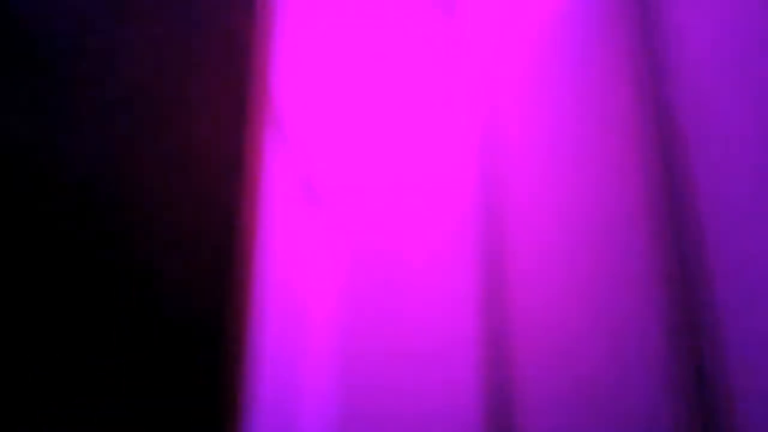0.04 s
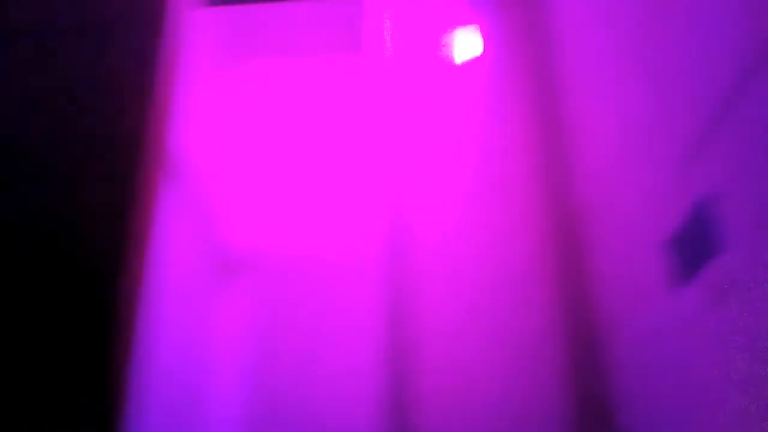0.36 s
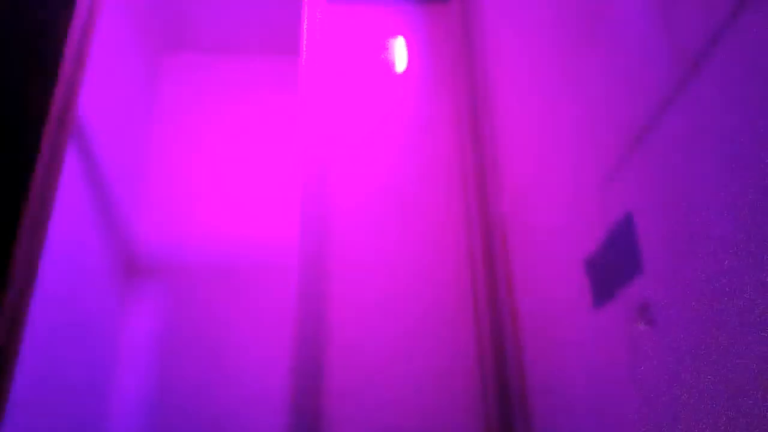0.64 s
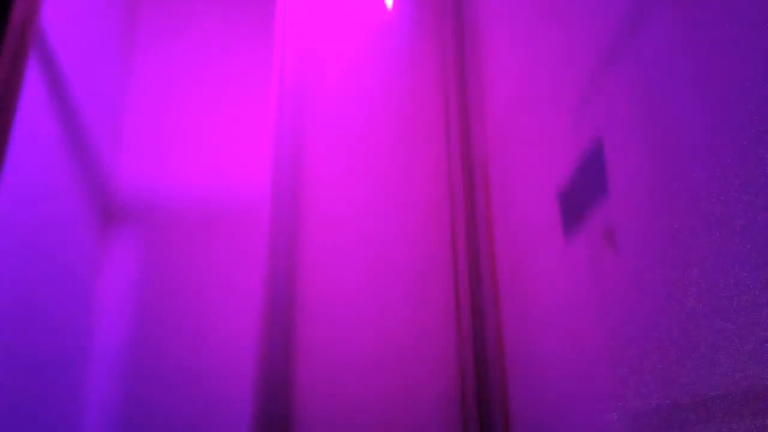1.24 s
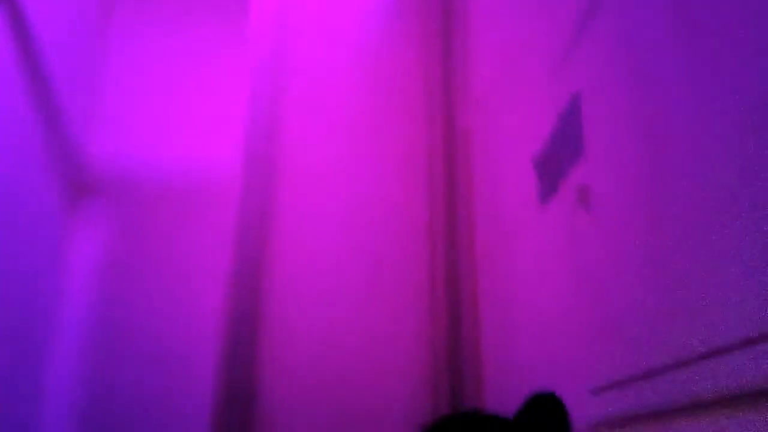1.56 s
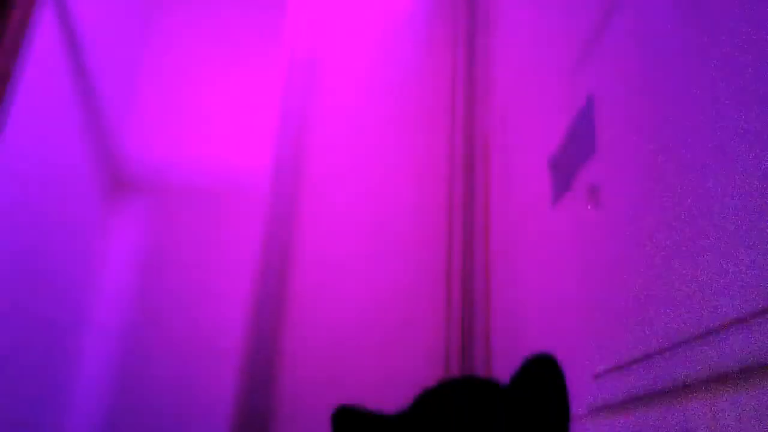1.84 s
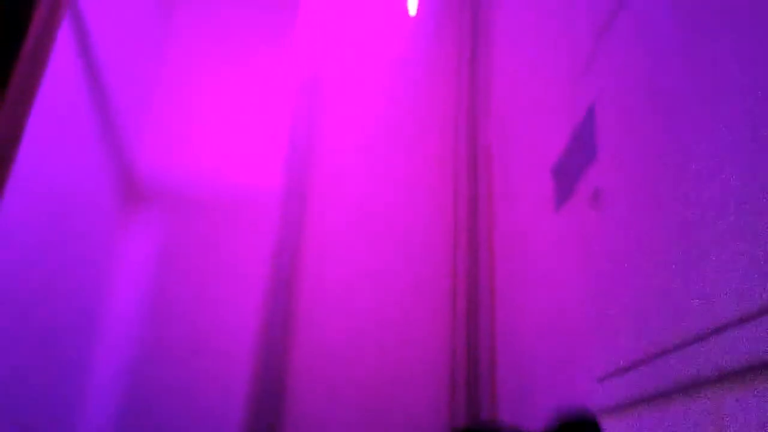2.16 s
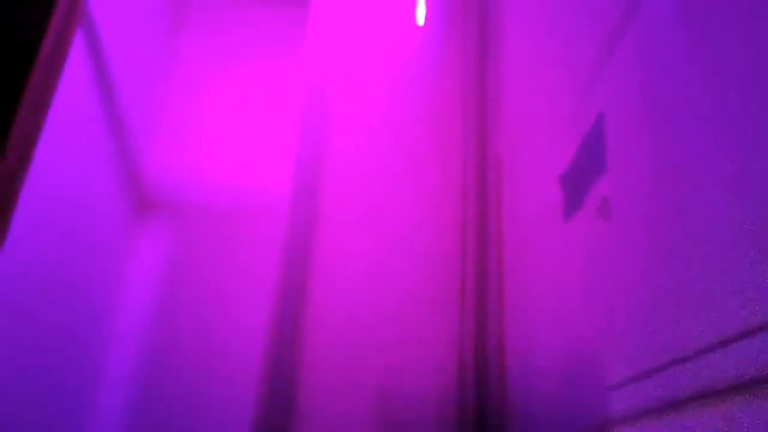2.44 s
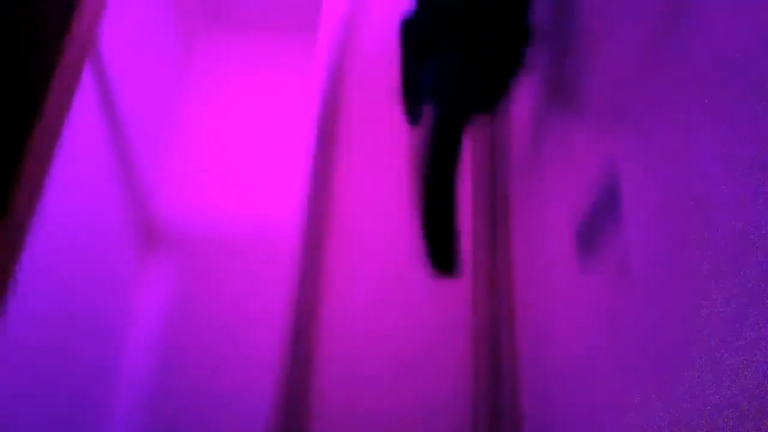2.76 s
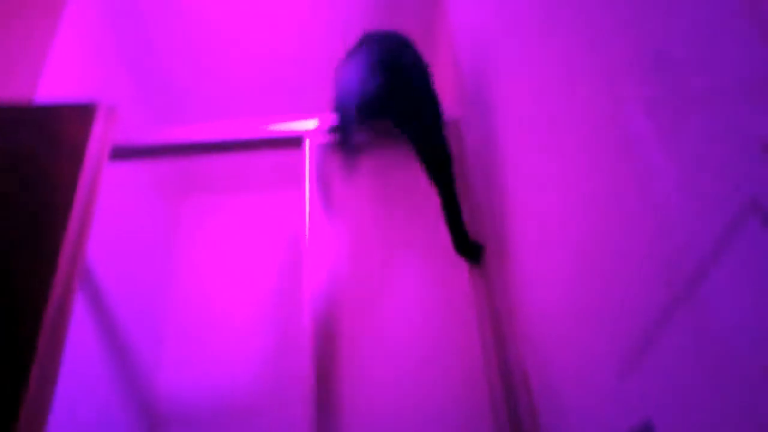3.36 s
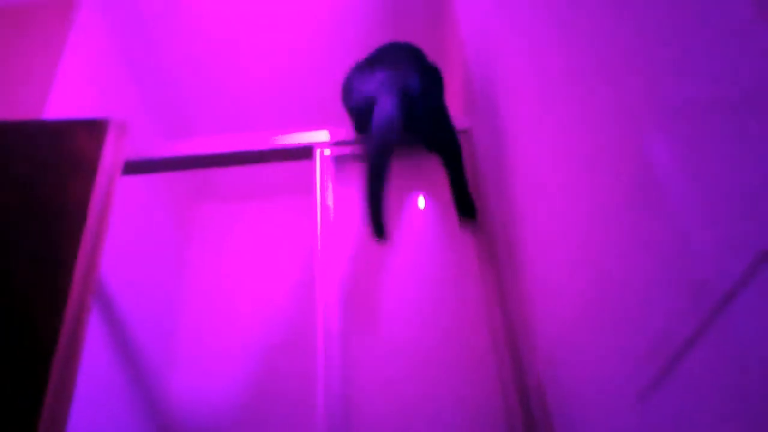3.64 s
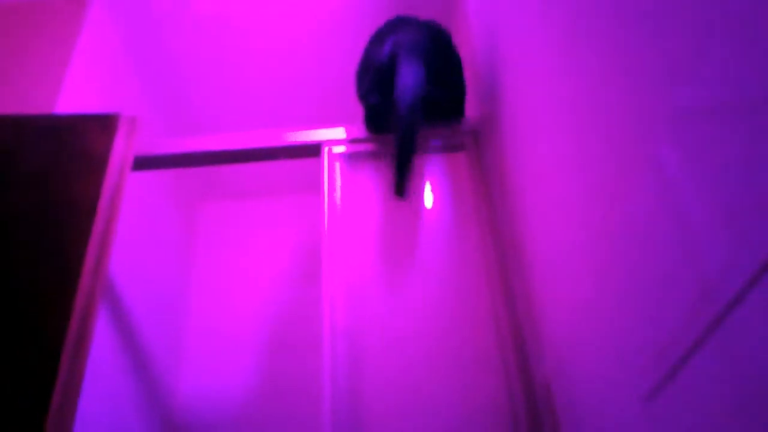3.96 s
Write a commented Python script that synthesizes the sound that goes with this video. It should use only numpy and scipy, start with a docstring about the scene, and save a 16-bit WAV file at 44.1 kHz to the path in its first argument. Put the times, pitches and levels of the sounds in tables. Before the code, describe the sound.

After a quiet moment, a cat crashes onto a glass shower wall, which booms and clatters.

```python
"""A cat slams into a glass shower enclosure, heard in stereo from inside a small tiled bathroom.
The panel booms and sways, the metal frame clatters, and the paws scrabble for a hold on the top rail.
Before the leap come soft steps and a push off the perch, over faint hiss and a low mains hum.
Right beside the microphone, the hand-held case gives dry ticks and dull finger bumps."""
import sys
import numpy as np
from scipy import signal
from scipy.io import wavfile

SR = 44100
rng = np.random.default_rng(int(sys.argv[2]) if len(sys.argv) > 2 else 0)


def generate_wav(signal):
    """Clip the signal to [-1, 1] and save it as 16-bit WAV at the path in sys.argv[1]."""
    frames = np.transpose(np.atleast_2d(signal))
    scaled = np.clip(frames, -1, 1) * 32767
    pcm = np.round(scaled).astype(np.int16)
    wavfile.write(sys.argv[1], SR, pcm)


N = 176400
T = np.arange(N) / SR


# paws and body hit the enclosure: t/s, glass level/dB, frame level/dB, rail level/dB, rattle decay/s
ENCLOSURE_HITS = [(2.665, -36, -33, -25, 0.0034), (2.915, -15.5, -24, -44, 0.0032),
                  (2.923, -4.5, 0.5, -12, 0.012), (2.949, 6, 4.5, -18, 0.001), (2.965, 1.5, -1, 0, .001),
                  (2.987, 2, 0.5, -24, 0.0036), (3.005, -2.5, -20, -9.5, 0.0047),
                  (3.045, -8.5, -31, -14, 0.014), (3.159, -14, -10, 0.5, 0.0028),
                  (3.241, -17.5, -7, -2.5, .005), (3.283, -19, -8.5, -17, 0.013),
                  (3.375, -23, -20.5, -29, 0.032), (3.451, -24, -17.5, -28, 0.0041),
                  (3.485, -27, -16.5, -30, 0.051), (3.517, -25.5, -18.5, -32, 0.016),
                  (3.554, -26.5, -26.5, -30.5, 0.014), (3.625, -24.5, -33, -34.5, 0.04)]
# ringing of the panel: f/Hz, level/dB, t60/s
PANEL_MODES = [(158, -8, .6), (184, -8, .45), (263, -4.5, .4), (300, -3.5, .45), (362, -1.5, .42),
               (482, -4, .25), (502, -6, .3), (555, -5, .27), (640, -2, .3), (734, -3, .28), (818, -3, .3),
               (905, -2, .27), (1020, -3, .28), (1058, -2, .28), (1413, -3, .25), (1592, -3, .27),
               (1907, -7, .25)]
# its dense wash of higher modes and wall reflections: f/Hz, level/dB
PANEL_COLOUR = [(40, -10), (110, -9.5), (260, 0.5), (450, 0), (700, 0), (1100, 0.5), (1800, -6),
                (3200, -22), (5500, -13.5), (8000, -41), (16000, -65)]
HIT_RATTLE_SHARE = 0.35

def glass_panel():
    """The cat bangs the glass: the panel rings and the tiled walls answer."""
    hits = [(t, db, decay) for t, db, _, _, decay in ENCLOSURE_HITS]
    wash = room(from_db(2) * contacts(hits, HIT_RATTLE_SHARE), PANEL_COLOUR)
    return wash + from_db(-37.5) * struck(hits, PANEL_MODES)


# clatter of the frame, plus the recorder's faint whistly sheen near 15 kHz: f/Hz, level/dB
CLATTER_COLOUR = [(200, -15), (700, -11), (1400, -5.5), (2400, 3), (3900, 3.5), (5400, 2.5), (6600, -14.5),
                  (8000, -28.5), (12500, -43), (15000, -25)]
# claws drag over the frame: t/s, level/dB, decay/s
CLAW_DRAGS = [(3.283, -60, .012), (3.452, -54, .02), (3.51, -58, 0.022)]
# the tones they excite: f/Hz, level/dB
FRAME_TONES = [(2498, -4), (3004, -7), (3526, -3), (4064, -1), (4134, -1), (5373, 0)]
FRAME_T60_S = 0.33

def metal_frame():
    """The loose frame clatters at each hit and sings under the claws."""
    hits = [(t, db, decay) for t, _, db, _, decay in ENCLOSURE_HITS]
    clatter = room(from_db(0.5) * contacts(hits, HIT_RATTLE_SHARE), CLATTER_COLOUR)
    return clatter + struck(CLAW_DRAGS, [(hz, db, FRAME_T60_S) for hz, db in FRAME_TONES])


# ringing of the rail, crowded around 4.6 kHz: f/Hz, level/dB
RAIL_TONES = [(860, -11), (1250, -13), (2293, -12), (3370, -10), (3515, -7), (3650, -9), (4290, -6),
              (4370, -4), (4516, -2), (4590, -2), (4636, -2), (4711, -3), (4759, -7), (4818, -4),
              (4890, -5), (4934, -6), (5776, -11)]
# its wash in the room: f/Hz, level/dB
RAIL_COLOUR = [(500, -20), (900, -9), (1800, -15), (2280, -6.5), (2900, -17), (3550, -6), (4050, -15),
               (4400, -2), (4900, -1), (5350, -15), (5900, -4.5), (6500, -12), (7700, -39), (15000, -42)]
RAIL_T60_S = 0.22

def top_rail():
    """The metal rail on top of the enclosure clanks as the paws scrabble at it."""
    hits = [(t, db, decay) for t, _, _, db, decay in ENCLOSURE_HITS]
    wash = room(from_db(1) * contacts(hits, HIT_RATTLE_SHARE), RAIL_COLOUR)
    clank = struck(hits, [(hz, db, RAIL_T60_S) for hz, db in RAIL_TONES])
    return wash + from_db(-31) * clank


# the cat's weight heaves the glass wall: t/s, level/dB
WALL_HEAVES = [(2.668, -48), (2.946, -26.5), (3.41, -48)]
# slow bending of that wall: f/Hz, level/dB, t60/s
BENDING_MODES = [(66.16, -4, 0.86), (77, -16.5, 0.35), (51, -11, 0.27)]
SWAY_RISE_S = 0.047

def wall_sway():
    """A deep boom swells as the weight arrives, then dies away."""
    out = np.zeros(N)
    for t, heave_db in WALL_HEAVES:
        age = np.maximum(T - t, 0)
        swell = np.minimum(age / SWAY_RISE_S, 1)
        since_peak = age - SWAY_RISE_S
        for hz, db, t60 in BENDING_MODES:
            fade = from_db(heave_db + db - 60 * np.maximum(since_peak, 0) / t60)
            out += swell * fade * np.sin(2 * np.pi * hz * since_peak)
    return out


# padded steps and the push-off: t/s, level/dB, decay/s
PAW_STEPS = [(.757, -22, 0.0025), (.785, -30, .003), (.86, -27, 0.02), (.888, -27.5, 0.014),
             (.925, -36, .01), (2.648, -25.5, 0.033), (2.688, -36, 0.011), (3.518, -17.5, 0.008),
             (3.63, -33, .04)]
# their spectrum: f/Hz, level/dB
PAW_COLOUR = [(50, -16), (150, -18), (310, 4), (550, -4.5), (900, -13.5), (2000, -18), (5000, -26),
              (16000, -69)]
# the perch rings underfoot: f/Hz, level/dB, t60/s
PERCH_MODES = [(275, -3, .12), (345, -3, .17), (468, -1, .12)]
# it thumps as the cat leaves: t/s, level/dB, decay/s
PERCH_THUMPS = [(2.685, -17.5, .01), (2.738, -18, .015), (3.55, -30, .01)]
# their spectrum: f/Hz, level/dB
PERCH_COLOUR = [(40, -12), (80, -7.5), (140, -4.5), (250, -16.5), (600, -33), (16000, -67)]
# claws scuff: t/s, level/dB, decay/s
CLAW_SCUFFS = [(2.46, -28.5, 0.26), (2.659, -18.5, 0.008), (2.689, -16.5, .001)]
# their spectrum: f/Hz, level/dB
CLAW_COLOUR = [(200, -18), (1000, -7), (2400, -4), (3400, -1), (4600, 3), (6200, -3.5), (8000, -24),
               (16000, -42)]

def paws():
    """Soft steps, thumps of the perch and claw scuffs reach the microphone through the room."""
    steps = room(from_db(-1) * contacts(PAW_STEPS, rattle_share=0.52), PAW_COLOUR)
    thumps = room(contacts(PERCH_THUMPS, rattle_share=0.44), PERCH_COLOUR)
    scuffs = room(contacts(CLAW_SCUFFS, rattle_share=0.88), CLAW_COLOUR)
    return steps + thumps + scuffs + from_db(-32) * struck(PAW_STEPS, PERCH_MODES)


# double ticks, likely the case creaking: t/s, level/dB, gap/s, second tick re first/dB, f/Hz
CASE_TICKS = [(.146, -48.5, .004, -17, 5170), (.7215, -45, 0.0032, -5, 4400),
              (1.250, -55.5, 0.0036, -2, 5000), (1.383, -55, .003, 2, 4870), (1.519, -54, 0.0032, -2, 4900),
              (1.585, -51, 0.0048, -1, 4830), (1.650, -52, 0.0029, -3, 4900),
              (1.717, -48.5, .0035, -2, 4800), (1.8557, -38.5, 0.0035, -1, 4710),
              (1.9283, -43.5, 0.0032, -0.5, 4730), (1.9933, -17.5, 0.00092, -10, 4890),
              (1.9989, -29, 0.00092, 1.5, 4920), (2.0024, -40.5, 0.0078, 4, 4430),
              (2.689, -34, .001, -16, 5400)]
TICK_WIDTH_HZ, TICK_LAG_S, TICK_PAN_DB = 1700, 0.000341, 5

def case_ticks():
    """Tiny paired snaps just right of the microphone, too close for the room to answer."""
    out, size = np.zeros(N), SR // 10
    for t, db, gap, second_db, hz in CASE_TICKS:
        pair = np.zeros(size)
        pair[0] = 1
        pair[int(gap * SR)] += from_db(second_db)
        snap = knock(pair, hz - TICK_WIDTH_HZ / 2, hz + TICK_WIDTH_HZ / 2, order=3)
        body = from_db(-17) * ring(pair, hz=1960, t60=0.0066)
        edge = from_db(-36) * pair
        start = int(t * SR)
        out[start:start + size] += from_db(db) * (snap + body + edge)
    left = np.interp(T - TICK_LAG_S, T, out)
    return np.array([left * from_db(-TICK_PAN_DB), out * from_db(TICK_PAN_DB)])


# fingers bump the case: t/s, level/dB
FINGER_BUMPS = [(0.359, -54), (0.453, -55), (.48, -50), (.648, -54), (.794, -54), (.917, -50), (0.943, -52),
                (0.969, -54), (1.548, -49.5), (1.588, -50.5), (1.596, -55), (1.752, -55), (1.7616, -43.5),
                (1.917, -52.5)]
# rumble contour of the shifting grip: t/s, level/dB
GRIP_CONTOUR = [(0, -53), (.5, -58), (.75, -62), (1.35, -67), (1.55, -55.5), (1.95, -67), (2.1, -69),
                (4, -69)]
# fingers slide on the case: t/s, level/dB, decay/s
FINGER_SLIDES = [(1.068, -51.5, 0.036), (1.595, -51.5, .022), (1.722, -53, 0.015)]
GRIP_KNOCKS_PER_S = 70

def handling():
    """Dull knocks, grip rumble and brief slides travel through the case to the microphone."""
    clicks = np.zeros(N)
    for t, db in FINGER_BUMPS:
        clicks[int(t * SR)] = from_db(db)
    bumps = knock(clicks, low_hz=95.5, high_hz=364)
    grip = crackle(N, GRIP_KNOCKS_PER_S) * from_db(np.interp(T, *np.transpose(GRIP_CONTOUR)))
    rumble = knock(grip, low_hz=95.5, high_hz=270) / 2
    slides = knock(contacts(FINGER_SLIDES, rattle_share=0.95), low_hz=4410, high_hz=5310)
    return bumps + rumble + slides


# reverberation of the bathroom: f/Hz, t60/s
BATHROOM_T60 = [(60, 1.1), (200, .3), (500, .4), (1200, .27), (3000, .38), (5000, .25), (15000, .3)]
# balance at the microphone: f/Hz, left minus right/dB
MIC_BALANCE = [(100, -1), (500, -1), (1800, -1), (3300, -2.5), (4800, -7), (6300, 2.5), (15000, 0)]
BUILD_UP_CYCLES, BUILD_UP_S, LEFT_LAG_S = 0.5, 0.00015, 0.00012

def room(clicks, colour):
    """Each click feeds the diffuse field between the tiles, which builds up and dies band by band."""
    out, grid_hz = np.zeros((2, N)), np.arange(20, SR // 2, 20)
    energy = clicks ** 2 / np.mean(from_db(at_hz(colour, grid_hz)) ** 2)
    for hz, band in noise_bands():
        feed = energy * from_db(at_hz(colour, hz)) ** 2
        fall = 1e-6 ** (1 / (SR * at_hz(BATHROOM_T60, hz)))
        rise = np.exp(-1 / (SR * (BUILD_UP_S + BUILD_UP_CYCLES / hz)))
        power = signal.lfilter([(1 - fall) * (1 - rise)], [1, -fall - rise, fall * rise], feed + 1e-18)
        pan = from_db(at_hz(MIC_BALANCE, hz) * np.array([[.5], [-.5]]))
        out += band * np.sqrt(power / 2) * pan
    return np.array([np.interp(T - LEFT_LAG_S, T, out[0]), out[1]])


# hiss of room and recorder, dull above 7 kHz, faint sheen near 15 kHz: f/Hz, relative level/dB
HISS_COLOUR = [(25, -21), (60, -6), (110, -5), (200, -15), (300, -15), (450, -19), (900, -19.5),
               (1900, -23), (6400, -25), (8200, -38), (13500, -37), (15200, -31)]
# mains hum: f/Hz, rms level/dB
MAINS_HUM = [(100.3, -66), (200, -82.5)]
HISS_DB = -62.5

def noise_floor():
    """Faint even hiss of room and recorder, and a mains hum."""
    hiss = sum(from_db(at_hz(HISS_COLOUR, hz)) * band for hz, band in noise_bands())
    hum = sum(from_db(db) * np.sin(2 * np.pi * (hz * T + rng.random())) for hz, db in MAINS_HUM)
    return from_db(HISS_DB) * hiss / hiss.std() + np.sqrt(2) * hum


# diffuse sound at the microphone: f/Hz, left-right correlation
MIC_CORRELATION = [(60, 0.44), (250, 0.23), (500, 0.44), (1000, 0.078), (2000, 0), (15000, 0)]

def noise_bands():
    """Narrow bands of stereo noise, partly alike in the bass and unrelated in the treble."""
    edges = np.concatenate([np.geomspace(22, 2000, 18)[:-1], np.geomspace(2000, 8000, 23)[:-1],
                            np.geomspace(8000, 16500, 6)])
    white = rng.standard_normal((2, 2, N + SR // 4))
    for k, (low, high) in enumerate(zip(edges, edges[1:])):
        sos = signal.butter(4, [low, high], "band", fs=SR, output="sos")
        mid, side = signal.sosfilt(sos, white[k % 2])[:, -N:]
        hz = np.sqrt(low * high)
        alike = at_hz(MIC_CORRELATION, hz)
        yield hz, np.sqrt(1 + alike) * mid + np.sqrt(1 - alike) * side * np.array([[1], [-1]])


def struck(hits, modes, lowpass_hz=7400):
    """Every hit excites each mode afresh; a low-pass takes the sharp edge off the ringing."""
    out = np.zeros((2, N))
    for hz, db, t60 in modes:
        tone = from_db(db) * ring(contacts(hits, rattle_share=0.2), hz, t60)
        lag = int(rng.uniform(.5, 1.73) * LEFT_LAG_S * SR)
        pan = from_db(at_hz(MIC_BALANCE, hz) / 2)
        out[0, lag:] += tone[:N - lag] * pan
        out[1] += tone / pan
    return signal.sosfilt(signal.butter(2, lowpass_hz, fs=SR, output="sos"), out)


def contacts(hits, rattle_share):
    """Each contact is one click and a dying run of small ones that carry a share of its energy."""
    out, size = np.zeros(N + SR), SR // 4
    for t, db, decay in hits:
        run = crackle(size, per_s=900) * np.exp(-T[:size] / decay)
        run *= np.sqrt(rattle_share / (np.sum(run ** 2) + 1e-12))
        run[0] += np.sqrt(1 - rattle_share)
        start = int(t * SR)
        out[start:start + size] += from_db(db) * run
    return out[:N]


def crackle(size, per_s):
    """Clicks of random height at random times."""
    return rng.standard_normal(size) * (rng.random(size) < per_s / SR)


def ring(clicks, hz, t60):
    """A unit click sets a sine of height 1 ringing."""
    radius, angle = from_db(-60 / (t60 * SR)), 2 * np.pi * hz / SR
    return signal.lfilter([0, np.sin(angle)], [1, -2 * radius * np.cos(angle), radius ** 2],
                          clicks + 1e-18)


def knock(clicks, low_hz, high_hz, order=2):
    """A unit click becomes a band-limited knock about 1 high."""
    sos = signal.butter(order, [low_hz, high_hz], "band", fs=SR, output="sos")
    return signal.sosfilt(sos, clicks + 1e-18) * SR / (2 * (high_hz - low_hz))


def at_hz(points, hz):
    """Read a table on a log-frequency axis."""
    freqs, values = np.transpose(points)
    return np.interp(np.log(hz), np.log(freqs), values)


def from_db(db):
    """Decibels to gain."""
    return 10 ** (np.asarray(db) / 20)


def scene():
    """The bathroom from where the microphone is held, left and right."""
    cat = glass_panel() + metal_frame() + top_rail() + wall_sway() + paws()
    return cat + case_ticks() + handling() + noise_floor()


CUTOFF_HZ = 15600

def record(dry):
    """The top is cut steeply."""
    return signal.sosfilt(signal.ellip(10, .1, 70, CUTOFF_HZ, fs=SR, output="sos"), dry)


dry = scene()
out = record(dry)
generate_wav(out)
```